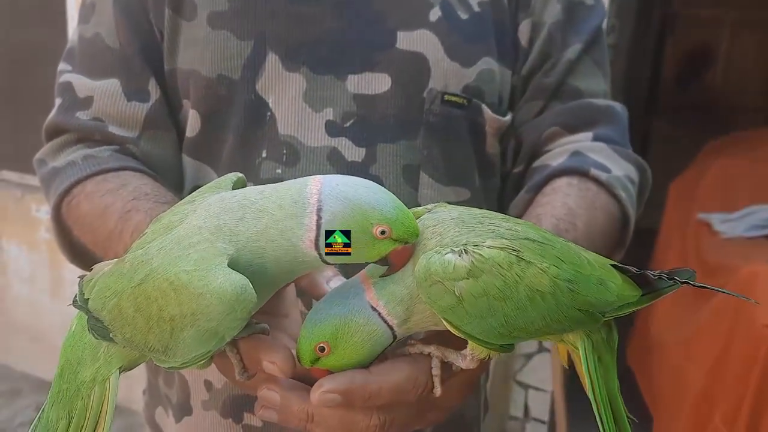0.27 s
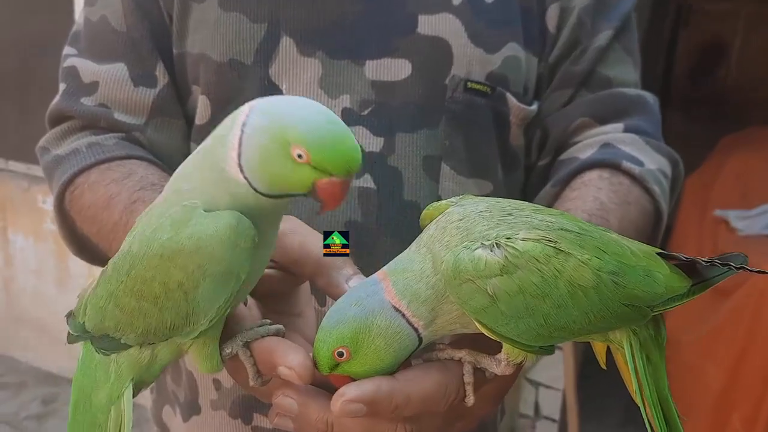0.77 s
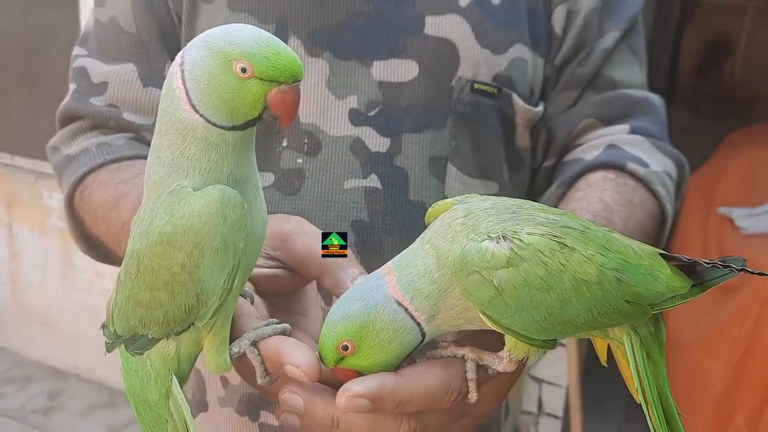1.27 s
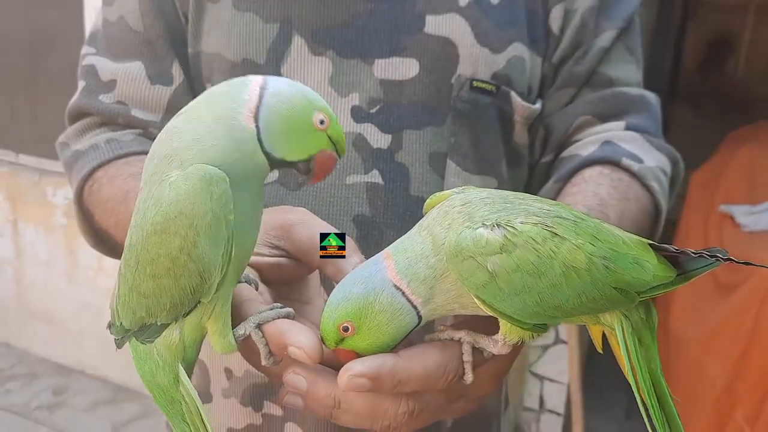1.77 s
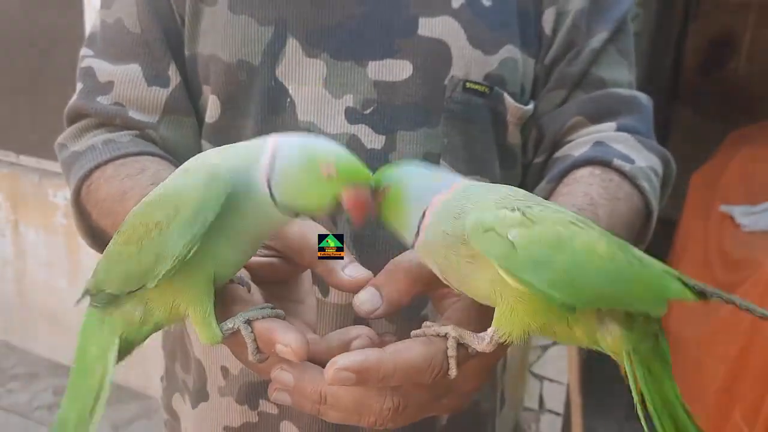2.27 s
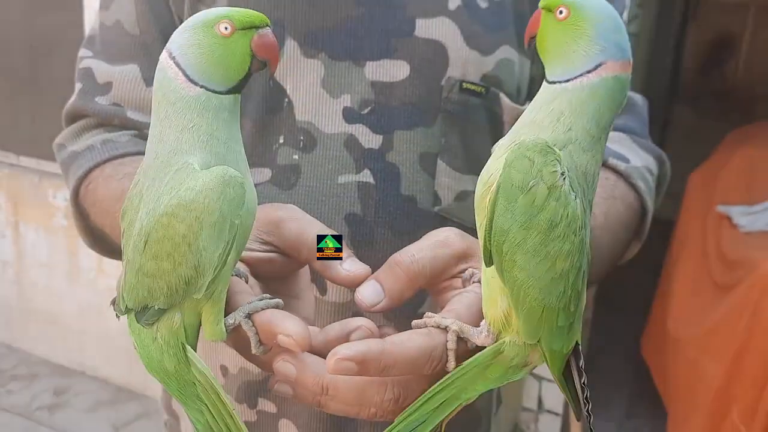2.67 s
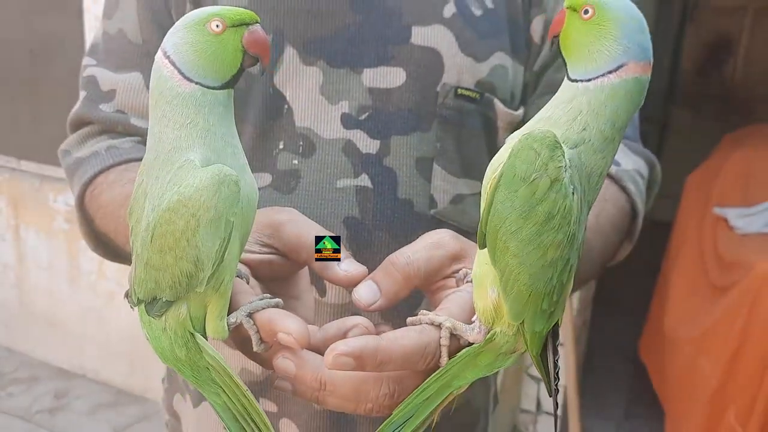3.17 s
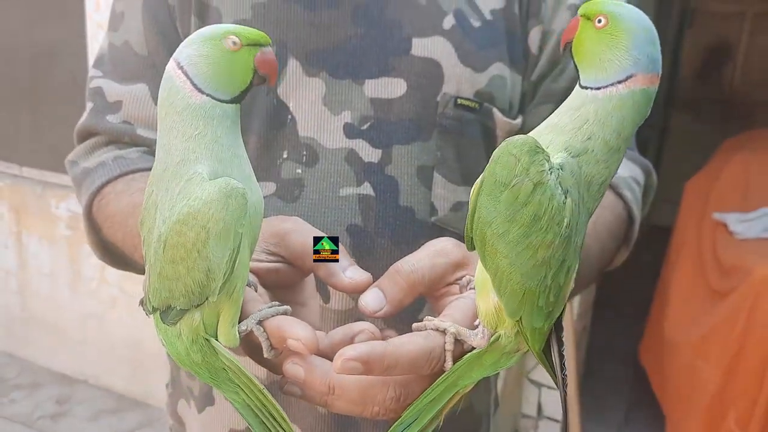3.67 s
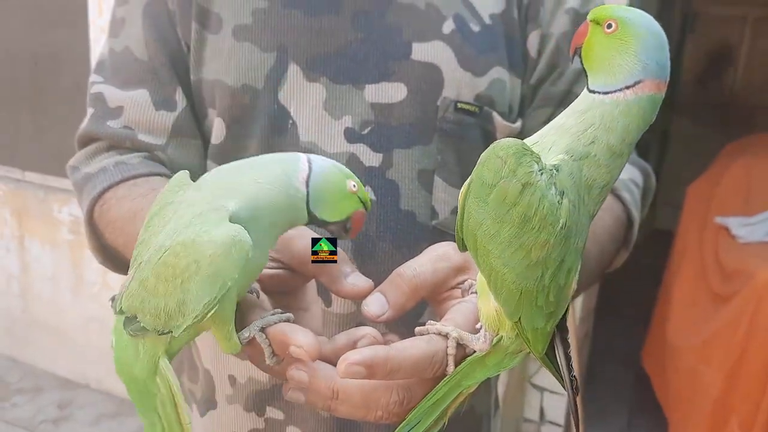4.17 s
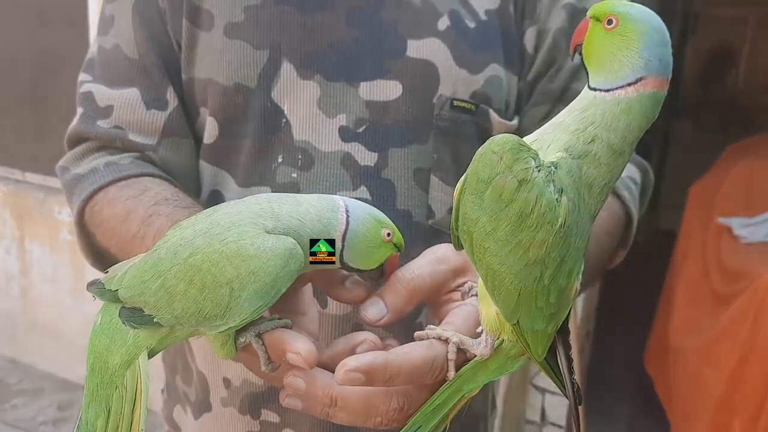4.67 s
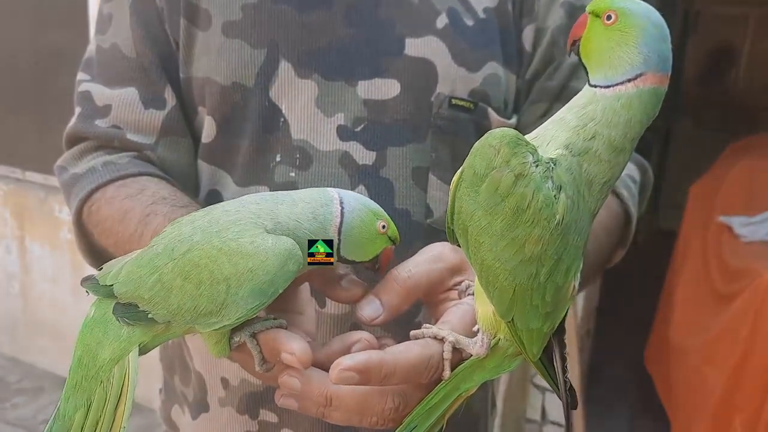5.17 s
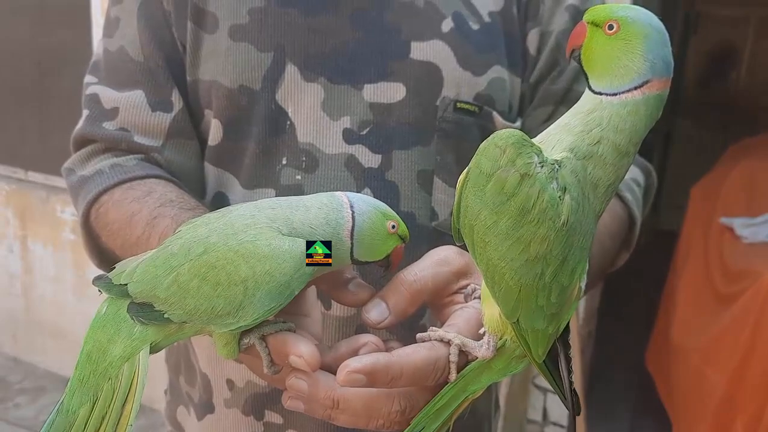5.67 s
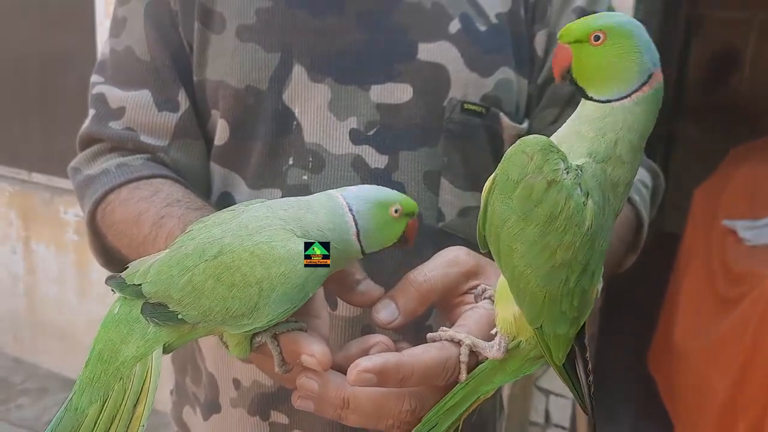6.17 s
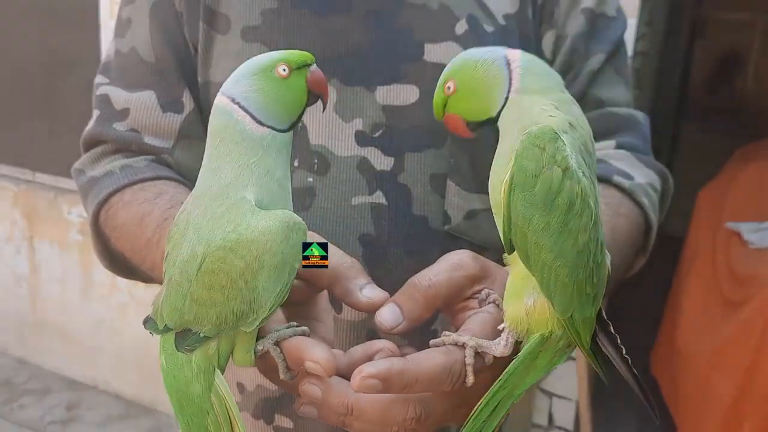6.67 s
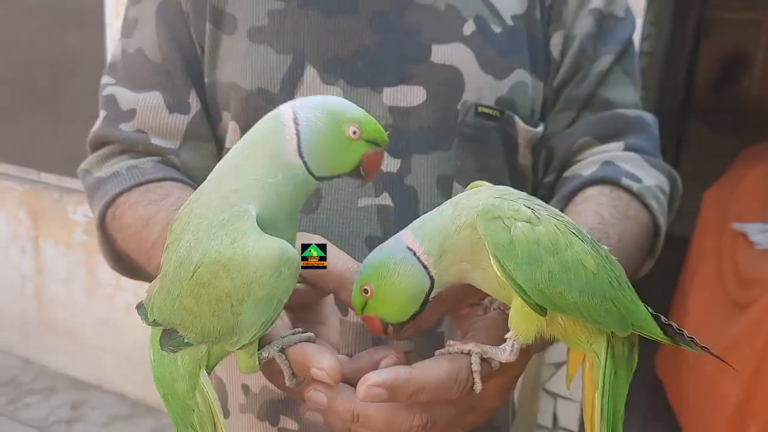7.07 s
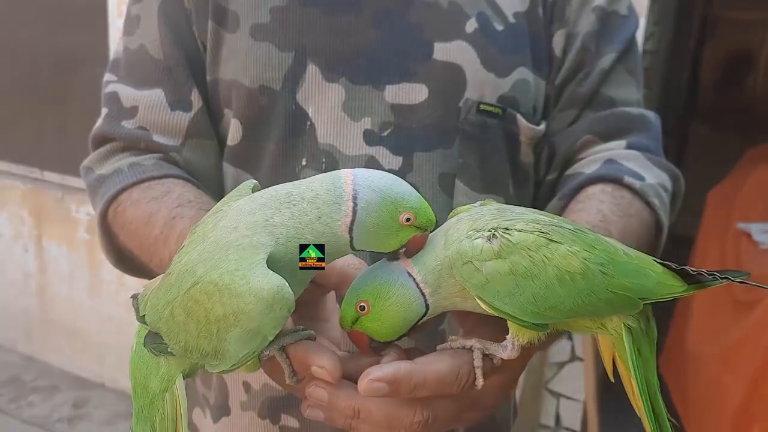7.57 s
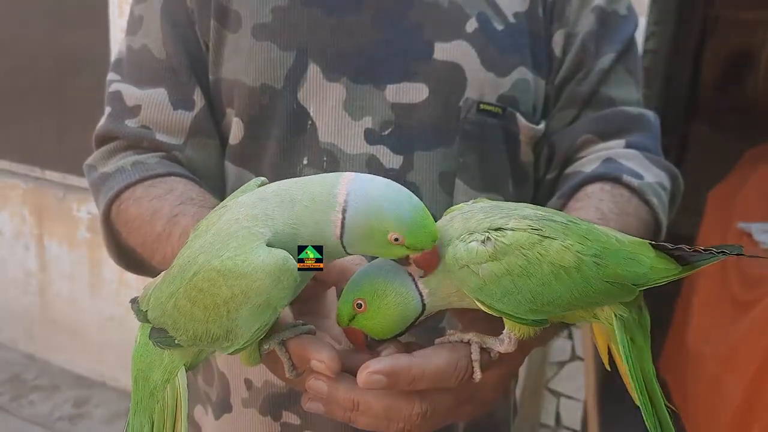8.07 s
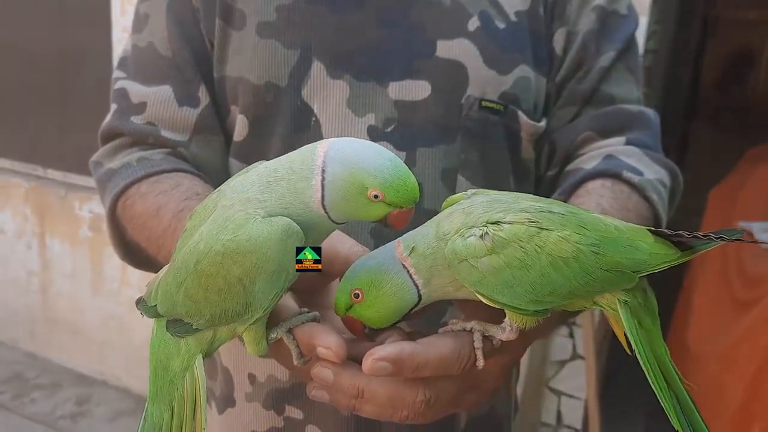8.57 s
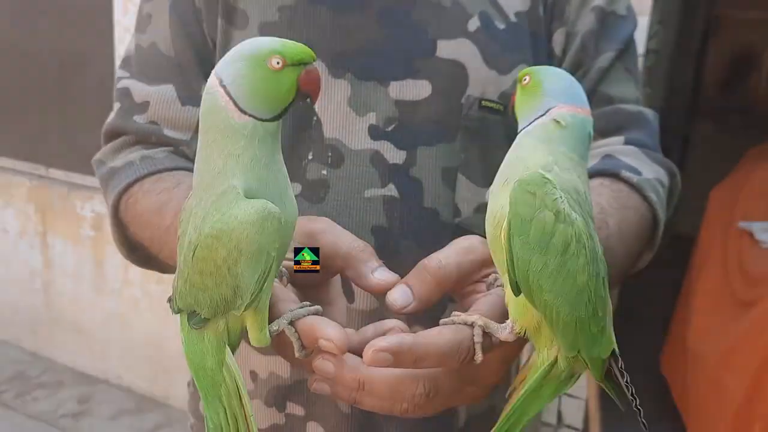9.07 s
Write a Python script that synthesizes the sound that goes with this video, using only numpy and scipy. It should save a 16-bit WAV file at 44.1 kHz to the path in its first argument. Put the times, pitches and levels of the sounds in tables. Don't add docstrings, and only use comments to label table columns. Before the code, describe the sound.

In a small walled yard, a near parakeet on the left opens with a clear held note of about 0.2 s, over a brief sliding undertone. Its beak clicks at 0.3 s, then five strained squeals scoop sharply upward between 0.4 and 2.05 s. From 2.2 to 3.1 s come soft beak clicks, seed ticks and faint distant peeps and chirps. A far horn wavers from 3.4 to 4.5 s. The near bird mutters around 4 s, rattles at 4.35 s, then mixes breathy hisses and six hoarse clucks from 4.6 to 5.9 s. From 5.4 s a second parakeet, on the right, screeches hoarsely every 0.3 s until the end, strongest around 7-8 s. Loud beak clicks land at 7.3-7.6 s, a whistle at 7.8-8.1 s, and three abrupt chucks at 8.2-8.6 s. Traffic rumble and air hiss persist; a low engine drone swells near 8.7 s.

```python
import sys
import numpy as np
from scipy import signal
from scipy.fft import rfft, irfft, next_fast_len
from scipy.io import wavfile
from scipy.ndimage import uniform_filter1d

SR = 44100
rng = np.random.default_rng(int(sys.argv[2]) if len(sys.argv) > 2 else 0)


def decibels_to_gain(level_db):
    exponent = np.asarray(level_db, float) / 20
    return 10 ** exponent


def master_out(mix):
    frames = np.transpose(np.atleast_2d(mix))
    ceiling = np.clip(frames, -1, 1)
    pcm = np.round(ceiling * 32767).astype(np.int16)
    wavfile.write(sys.argv[1], SR, pcm)


N = 410571


def evened(x):
    return x / np.sqrt(np.mean(abs(x) ** 2) + 1e-20)


def read(points, hz):
    f, value = np.transpose(points)
    return np.interp(np.log(hz + 1), np.log(f + 1), value)


def add(mix, s, sound):
    part = mix[round(s * SR):][:len(sound)]
    part += sound[:len(part)]


def curves(rows):
    s, *columns = np.transpose(rows)
    return [np.interp(np.arange(s[0], s[-1], 1 / SR), s, c) for c in columns]


def tinted(size, points):
    spectrum = rfft(rng.standard_normal(size))
    return evened(irfft(spectrum * decibels_to_gain(read(points, np.fft.rfftfreq(size, 1 / SR))), size))


def syrinx(hz, order_db, hoarse, flutter_hz):
    out, turns = 0, 2 * np.pi * np.cumsum(hz) / SR
    for k, db in enumerate(order_db, 1):
        r = np.exp(-np.pi * flutter_hz * np.sqrt(k) / SR)
        noise = rng.standard_normal((len(hz) + 500, 2)) @ [1, 1j]
        shake = signal.lfilter([1], [1, -2 * r, r * r], noise)[500:]
        share = np.clip(hoarse * (k * hz / 3000) ** 0.75, 0, 1)
        waver = np.sqrt(1 - share) + np.sqrt(share) * evened(shake)
        wave = (waver * np.exp(1j * k * (turns + k / 2))).real
        out = out + decibels_to_gain(db) * (k * hz < 16500) * wave
    return evened(out)


def call(rows, throat, breath_db, flutter_hz, break_db=0, flare_db=0, dull=0):
    db, hz, hoarse = curves(rows)
    hz = uniform_filter1d(hz, size=min(len(hz) // 8, 700), mode="nearest")
    order_db = [read(throat, k * hz) for k in range(1, 26)]
    breaks = uniform_filter1d(uniform_filter1d(rng.standard_normal((25, len(hz))), size=500), size=300)
    order_db = order_db + break_db * evened(breaks) * np.minimum(np.arange(25) / 2, 1)[:, None]
    order_db[1] += flare_db * np.interp(hz, [1190, 1740], [0, 1])
    effort_db = dull * (db - db.max())
    order_db += effort_db * np.arange(25)[:, None]
    power = sum(decibels_to_gain(d) ** 2 for d in order_db)
    voice = syrinx(hz, order_db - 10 * np.log10(power), hoarse, flutter_hz)
    breath = decibels_to_gain(breath_db + 2 * effort_db) * hoarse * tinted(len(hz), throat)
    return decibels_to_gain(db) * (voice + breath) * signal.windows.tukey(len(hz), 200 / len(hz))


def sing(notes):
    out = np.zeros(N)
    for rows, order_db, hoarse, flutter_hz in notes:
        hz, db = curves(rows)
        hz = uniform_filter1d(hz, size=500, mode="nearest")
        voice = decibels_to_gain(db) * syrinx(hz, order_db, hoarse, flutter_hz)
        add(out, rows[0][0], voice * signal.windows.tukey(len(hz), .15))
    return out


# frequency in Hz, level in dB.
SQUEAL_THROAT = [(500, 2.5), (900, -14), (1500, -9), (2200, -6.5), (2900, -5.5), (3600, -1), (4200, -3),
                 (4700, -3.5), (5300, -2), (5900, -6.5), (6400, -15), (7400, -10), (8300, -13.5),
                 (9300, -25), (11500, -18), (16000, -22)]


def squeal(length, db, first_hz, knee_hz):
    hold_s, shut_s = .009, .013
    top_hz, strain_hz_per_s = 2200, 12200
    top = length - hold_s - shut_s
    knee = top - (top_hz - knee_hz) / strain_hz_per_s
    shape = [(0, -23, first_hz), (.04, -11.5, 928), (knee, -6.5, knee_hz),
             ((knee + top) / 2, 1, (knee_hz + top_hz) / 2), (top, 0, top_hz),
             (top + hold_s, -7.5, top_hz), (length, -17.5, top_hz - 20)]
    rows = [(s, db + d, hz, np.interp(hz, [1000, 1500, 2100], [.11, .27, .42])) for s, d, hz in shape]
    voice = call(rows, SQUEAL_THROAT, breath_db=-13.0, flutter_hz=410, break_db=3, flare_db=7.5, dull=0.053)
    crack = np.exp(-((np.arange(len(voice)) / SR - knee - 0.025) / 0.0067) ** 2)
    voice = voice * decibels_to_gain(-2.5 * crack)
    add(voice, .006, decibels_to_gain(-18.5) * voice.copy())
    at = np.arange(len(voice))
    return voice - decibels_to_gain(-14) * np.interp(at - 0.000632 * SR, at, voice)


# start in seconds, length in seconds, level in dB, first pitch in Hz,
# pitch where the strain begins in Hz.
SQUEALS = [
    (0.389, 0.235, -18, 788, 1354),
    (0.744, .22, -19, 631, 1206),
    (1.093, .22, -19.5, 653, 1216),
    (1.453, .22, -20.5, 628, 1221),
    (1.816, .23, -20.5, 629, 1225),
]


def squeals():
    out = np.zeros(N)
    for s, *row in SQUEALS:
        add(out, s, squeal(*row))
    return out


# time in seconds, level in dB, pitch in Hz, hoarseness from 0 to 1.
HELD = [(0, -24, 966, 0.13), (.036, -23.5, 1011, 0.04), (.114, -25.5, 1034, 0.12),
        (.152, -27.5, 1032, 0.16), (.178, -49.5, 980, 0.2)]
# frequency in Hz, level in dB.
HELD_THROAT = [(530, -17), (900, -9.5), (1830, -11.5), (2070, -1), (2450, -14), (3070, -11.5), (4150, -9.5),
               (4800, -4.5), (5300, -2), (5900, -16), (6640, -15.5), (7060, -16.5), (10400, -24.5),
               (12400, -18.5), (16000, -31)]


def held_note():
    out = np.zeros(N)
    add(out, 0, call(HELD, HELD_THROAT, breath_db=8, flutter_hz=45))
    return out


# start in seconds, length in seconds, level in dB, highest pitch in Hz.
CLUCKS = [
    (4.784, 0.055, -27, 992),
    (4.98, 0.063, -25, 1050),
    (5.203, 0.061, -25.5, 1020),
    (5.419, 0.065, -24, 1050),
    (5.626, .062, -23, 1164),
    (5.821, 0.069, -24, 1170),
]
# frequency in Hz, level in dB.
CLUCK_THROAT = [(400, -32), (620, 0), (1000, -11), (1400, -0.5), (1800, -4), (2300, 3), (2900, -5.5),
                (3600, -4), (4400, -4), (6200, -14.5), (12000, -17), (16000, -25.5)]


def clucks():
    low_hz, hoarse = 560, .55
    humps = [(0, .1, -13), (.33, 1, -0.5), (.52, .6, 1), (.68, 1.15, 4.5), (.82, .6, 0), (1, -0.07, -2)]
    out = np.zeros(N)
    for s, length, db, top_hz in CLUCKS:
        arch = [(s + u * length, db + d, low_hz + lift * (top_hz - low_hz), hoarse) for u, lift, d in humps]
        add(out, s, call(arch, CLUCK_THROAT, breath_db=-3, flutter_hz=260, dull=.12))
    return out


# start in seconds, length in seconds, level in dB, first pitch in Hz, highest in Hz.
CHUCKS = [
    (8.222, 0.027, -18.5, 1253, 1533),
    (8.38, 0.031, -19, 1193, 1702),
    (8.546, 0.036, -19, 1300, 1970),
]
# frequency in Hz, level in dB.
CHUCK_THROAT = [(350, -49), (600, -11), (727, -8.5), (1210, -13.5), (1490, -9.5), (1680, -18.5),
                (2180, 9.5), (2500, -7), (3300, 0), (3890, -0.5), (4700, -4), (5600, -10.5), (16000, -24)]
MUTTERS = [
    (3.916, 0.011, -36.5, 540, 525),
    (4.121, 0.026, -31.5, 590, 517),
]
# frequency in Hz, level in dB.
MUTTER_THROAT = [(260, -34), (450, -7), (1240, -9.5), (1530, 0), (1780, -23), (2070, 3), (2400, -27),
                 (3810, -5.5), (4770, -18.5), (11300, -29), (16000, -35)]


def chucks_and_mutters():
    out = np.zeros(N)
    for table, throat, end in [(CHUCKS, CHUCK_THROAT, 0.31), (MUTTERS, MUTTER_THROAT, 0.734)]:
        for s, length, db, first_hz, top_hz in table:
            drop = [(0, db - 2, first_hz, .4), (0.43 * length, db, top_hz, .3),
                    (length, db - 11.5, end * first_hz, .5)]
            add(out, s, call(drop, throat, breath_db=-1, flutter_hz=300, dull=.12))
    return out


# time in seconds, level in dB, puffs per second.
RATTLE = [(4.343, -40, 68.4), (4.37, -32.5, 87.4), (4.409, -36.5, 69), (4.451, -47, 66)]
# frequency in Hz, width in Hz, level in dB.
RATTLE_RINGS = [(600, 43, 12), (1050, 170, 11), (1536, 130, 9), (1910, 330, 4), (2600, 300, -22),
                (5360, 440, -8)]


def rattle():
    db, rate = curves(RATTLE)
    at = np.arange(len(db))
    pulses = np.diff(np.floor(np.cumsum(rate) / SR), prepend=-1)
    pulses = pulses * decibels_to_gain(1.5 * rng.standard_normal(len(db)))
    grain = rng.standard_normal(len(db)) * 1.6 + np.cos(at * .2)
    puffs = signal.fftconvolve(pulses, np.hanning(220))[:len(db)] * grain
    t = np.arange(600) / SR
    ring = sum(decibels_to_gain(d) * width * np.exp(-np.pi * width * t) * np.sin(2 * np.pi * hz * t)
               for hz, width, d in RATTLE_RINGS)
    sound = evened(signal.fftconvolve(puffs, ring)[:len(db)])
    slowing = np.cumsum(np.linspace(1.08, 0.92, len(db)))
    sound = decibels_to_gain(db) * np.interp(slowing, at, sound) * np.minimum(at / 300, 1)
    out = np.zeros(N)
    add(out, RATTLE[0][0], sound)
    return out


# start in seconds, level in dB, length in seconds, beak whistle in dB.
HISSES = [
    (4.597, -23, 0.079, -1.5),
    (4.896, -24.5, 0.065, -8),
    (5.193, -25, .05, -3),
    (5.673, -27.5, .045, -9),
    (5.909, -25.5, .025, -9.5),
]
# frequency in Hz, level in dB.
HISS = [(500, -20), (900, -17), (1500, -21.5), (2500, -11), (3800, -12.5), (5800, -9.5), (6900, -8),
        (7700, -5.5), (8600, -6), (9800, -11.5), (12300, -6), (16000, -14)]
# frequency in Hz, level in dB.
HISS_WHISTLE = [(5500, -45), (7200, 0), (8200, 2), (9000, -12), (10500, -42)]


def hisses():
    out = np.zeros(N)
    for s, db, length, whistle_db in HISSES:
        puff = [(0, -14), (.003, -3), (.22 * length, 0), (0.6 * length, -3), (0.67 * length, -12), (length, -30)]
        level_db, = curves(puff)
        breath = tinted(len(level_db), HISS)
        whistle = decibels_to_gain(whistle_db) * tinted(len(level_db), HISS_WHISTLE)
        add(out, s, decibels_to_gain(db + level_db) * (breath + whistle))
    return out


# time in seconds, pitch in Hz, level in dB.
WHISTLES = [
    [(4.87, 1590, -28), (4.884, 1493, -36.5), (4.966, 1485, -24), (5.006, 1656, -27.5), (5.02, 1890, -40)],
    [(7.785, 1178, -40), (7.801, 1188, -43), (7.913, 1305, -33.5), (7.975, 1806, -36), (8.012, 1924, -29.5),
     (8.026, 1890, -51), (8.04, 1870, -34.5), (8.099, 1420, -28.5), (8.125, 1355, -35)],
]
# time in seconds, pitch in Hz, level in dB.
SLIDE = [(.03, 894, -50), (.05, 716, -36), (.09, 600, -35), (.135, 385, -43.5)]
SLIDE_ORDERS_DB = [2, 2.5, 2.5, -13]


def whistles_and_slide():
    notes = [(rows, [0, -45], .02, 60) for rows in WHISTLES]
    return sing(notes + [(SLIDE, SLIDE_ORDERS_DB, .2, 60)])


# start in seconds, peak in dB, low ring in Hz, high ring in Hz, crack in dB.
CLICKS = [
    (0.298, -23.5, 2465, 2600, -7),
    (2.253, -35, 2120, 2200, -22),
    (2.394, -36, 1910, 2920, -14),
    (2.761, -31, 2180, 2260, 8.5),
    (2.914, -31, 2170, 2200, 10),
    (7.304, -19.5, 1050, 4260, 3.5),
    (7.452, -17.5, 1110, 2190, -2),
    (7.607, -22, 1010, 4230, 4.5),
]
# frequency in Hz, level in dB.
CRACK = [(410, -55.5), (700, -69), (1020, -4.5), (1460, -27.5), (2220, -3), (2800, -13), (5610, -20),
         (6650, -22.5), (16000, -35.5)]


def beak_clicks():
    middle, left = np.zeros((2, N))
    t = np.arange(900) / SR
    for s, db, low_hz, high_hz, crack_db in CLICKS:
        ring = np.sin(2 * np.pi * low_hz * t) + 0.72 * np.sin(2 * np.pi * high_hz * t)
        crack = decibels_to_gain(crack_db - 60 * t / 0.012) * tinted(len(t), CRACK)
        click = decibels_to_gain(db) * (ring * decibels_to_gain(-60 * t / 0.021) + crack) * np.minimum(t / 0.0015, 1)
        add(middle if s < 3 else left, s, click)
    return middle, left


# frequency in Hz, level in dB.
CLAW = [(3000, -26), (6500, -17), (11000, 8), (16000, -4)]


def claw_tick():
    out = np.zeros(N)
    t = np.arange(900) / SR
    add(out, 5.298, decibels_to_gain(-38 - 60 * t / 0.022) * tinted(len(t), CLAW))
    return out


# start in seconds, level in dB, pitch in Hz.
SEEDS = [
    (2.726, -55, 4700),
    (2.745, -52, 3900),
    (3.85, -51, 9000),
    (3.88, -52, 6200),
    (7.53, -43, 8980),
]


def seed_ticks():
    out = np.zeros(N)
    t = np.arange(900) / SR
    for s, db, hz in SEEDS:
        band = [(.6 * hz, -25), (hz, 0), (1.13 * hz, -20)]
        add(out, s, decibels_to_gain(db - 60 * t / 0.035) * tinted(len(t), band))
    return out


def left_bird():
    middle_clicks, left_clicks = beak_clicks()
    left = held_note() + squeals() + chucks_and_mutters() + rattle() + whistles_and_slide()
    left += left_clicks + claw_tick()
    return left, clucks() + middle_clicks + seed_ticks(), hisses()


LEAD_S = .018
# share of the fall time, pitch in Hz, level in dB.
SCREECH_FALL = [(.13, 2129, -3.5), (.24, 1963, -3), (.42, 1790, -4.5), (.64, 1625, -9.5), (.92, 1660, -20),
                (1.3, 1720, -27)]
# frequency in Hz, level in dB.
SCREECH_THROAT = [(1600, -10.5), (2000, -13), (2700, -11), (3300, 5.5), (3700, 4.5), (4100, 0),
                  (4600, -0.5), (5300, -1), (6000, -10), (7000, -7), (8000, -22.5), (9500, -19.5),
                  (12000, -21), (16000, -35)]
# frequency in Hz, level in dB.
RASP = [(600, -17.5), (1000, -14), (1500, -14), (1900, -15), (2600, -11.5), (3050, -12), (3500, -7.5),
        (4300, -3.5), (6500, -17), (8000, -9), (16000, -19)]


def screech(start_hz, top_hz, crest, hold):
    rows = [(-LEAD_S, start_hz, -27), (0, start_hz, -21), (0.305 * crest, start_hz, -11),
            (.45 * crest, start_hz + 150, -7), (.75 * crest, top_hz - 110, -5),
            (crest, top_hz, -3.5), (crest + hold, top_hz - 90, -4)]
    rows += [(crest + hold + u * .138, hz, d) for u, hz, d in SCREECH_FALL]
    hz, level_db = curves(rows)
    hz = uniform_filter1d(hz, size=200, mode="nearest")
    drift = evened(uniform_filter1d(rng.standard_normal(len(hz)), size=900))
    beat = np.cumsum(77 * (1 + .25 * drift)) / SR
    level_db = level_db + 1.8 * (np.cos(2 * np.pi * beat) - .4)
    order_db = np.array([read(SCREECH_THROAT, k * hz) + 0.023 * max(k - 2, 0) * level_db for k in range(1, 9)])
    order_db -= 10 * np.log10(np.sum(decibels_to_gain(order_db) ** 2, axis=0))
    hoarse = np.interp(level_db, [-12, -3], [.95, .48])
    voice = syrinx(hz, order_db, hoarse, 340)
    return decibels_to_gain(level_db) * (voice + decibels_to_gain(-6.5) * tinted(len(hz), RASP))


# start in seconds, level in dB, opening pitch in Hz,
# seconds until the crest, seconds the crest is held.
SCREECHES = [(5.379, -22.5, 2200, 0.037, 0.021), (5.642, -23, 2296, .016, .02),
             (5.902, -22, 2450, 0.025, 0.019), (6.161, -21.5, 2372, 0.037, 0.018),
             (6.436, -21, 2200, 0.034, .02), (6.705, -20, 2200, 0.045, 0.017),
             (6.979, -18.5, 2255, 0.048, 0.015), (7.278, -18.5, 1980, .043, .013),
             (7.579, -19, 1982, 0.047, 0.016), (7.88, -18.5, 1964, .047, .013),
             (8.18, -20, 2050, 0.047, .016), (8.48, -21, 1995, 0.039, .02),
             (8.768, -20, 1919, 0.041, 0.024), (9.063, -19.5, 1890, 0.046, 0.025)]


def right_bird():
    out = np.zeros(N)
    for s, db, start_hz, crest, hold in SCREECHES:
        top_hz = 2873 - 10000 * hold
        add(out, s - LEAD_S, decibels_to_gain(db) * screech(start_hz, top_hz, crest, hold))
        held = 1.03 * start_hz * np.ones(round((crest + 0.0085) * SR))
        add(out, s, decibels_to_gain(db - 10) * np.hanning(len(held)) ** 0.7 * syrinx(held, [-14, 0], 0.72, 250))
        stay = top_hz * np.ones(round(0.034 * SR))
        add(out, s + 0.78 * crest, decibels_to_gain(db - 19) * np.hanning(len(stay)) ** 0.3 * syrinx(stay, [0, -6], 0.1, 160))
    dry_bird = out.copy()
    for lag_s, db in [(.007, -14), (.013, -14), (.022, -19)]:
        add(out, lag_s, decibels_to_gain(db) * dry_bird)
    return out


# time in seconds, pitch in Hz, level in dB.
CHIRP = [(2.32, 2210, -49), (2.33, 2210, -39), (2.354, 2158, -39), (2.39, 2065, -41.5), (2.4, 1980, -59)]
CHIRP_ORDERS_DB = [-9.5, -1.5, -10.5, -12, -19, -16, -17]


def right_chirp():
    return sing([(CHIRP, CHIRP_ORDERS_DB, .2, 90)])


# start in seconds, length in seconds, level in dB,
# pitch at both ends in Hz, pitch at the bend in Hz.
PEEPS = [
    (0.641, 0.057, -38, 1955, 2305),
    (2.795, 0.14, -57.5, 1820, 1516),
]
PEEP_ORDERS_DB = [-3, -41, -27, -36, -36, -50.5, -36]
# time in seconds, pitch in Hz, level in dB.
FLICK = [(2.875, 1620, -54), (2.885, 1950, -37.5), (2.91, 2340, -47)]
# time in seconds, pitch in Hz, level in dB.
PIPE = [(3.001, 2060, -52), (3.022, 1934, -44), (3.062, 1932, -35), (3.1, 2150, -41.5), (3.114, 2170, -55)]
# time in seconds, pitch in Hz, level in dB.
SCOLD = [(2.712, 2870, -58), (2.735, 2484, -51), (2.79, 2164, -46.5), (2.83, 1900, -63)]
# time in seconds, pitch in Hz, level in dB.
COO = [(2.525, 635, -67), (2.6, 812, -59), (2.615, 790, -55), (2.632, 686, -56)]
COO_ORDERS_DB = [-31, -8, 0, -9]


def yard_birds():
    bends = []
    for s, length, db, ends_hz, bend_hz in PEEPS:
        bend_s = 0.37 * length
        bends.append([(s, ends_hz, db - 14), (s + bend_s / 2, 0.33 * ends_hz + 0.82 * bend_hz, db - 14 / 3),
                      (s + bend_s, bend_hz, db), (s + length, ends_hz, db - 13.5)])
    peeps = [(rows, PEEP_ORDERS_DB, .15, 60) for rows in bends + [FLICK, PIPE]]
    return sing(peeps + [(SCOLD, [0, -18], .8, 350), (COO, COO_ORDERS_DB, .15, 60)])


# multiple of its pitch, level in dB.
HORN = [(5, -68), (6, -46), (7, -49), (8, -68), (15, -79), (18, -80), (23, -86), (27, -88)]
# time in seconds, level in dB.
HORN_SWELL = [(3.441, -44), (3.56, -4), (4.1, -0.5), (4.35, -6), (4.47, -25)]


def horn():
    level_db, = curves(HORN_SWELL)
    order_db = [dict(HORN).get(k, -140) for k in range(1, 28)]
    loud_db = 10 * np.log10(np.sum(decibels_to_gain(np.array(order_db)) ** 2))
    out = np.zeros(N)
    pitch_hz = 456 + 0 * level_db
    add(out, HORN_SWELL[0][0], decibels_to_gain(level_db + loud_db) * syrinx(pitch_hz, order_db, 0.6, 22))
    return out


# frequency in Hz, likeness from 0 to 1.
SAME = [(60, 0.92), (200, 0.94), (500, 0.22), (1500, 0.056), (8000, 0.083)]


def wash(points, patchy_db):
    frames, hz = N // 256 + 5, np.fft.rfftfreq(1024, 1 / SR)
    a, b, c, d, patches = rng.standard_normal((frames, 513, 5)).T
    patches = evened(uniform_filter1d(uniform_filter1d(patches, size=8, axis=0), size=14, axis=1))
    same = np.clip(read(SAME, hz), -1, 1)[:, None]
    left = a + 1j * b
    z = np.array([left, same * left + np.sqrt(1 - same ** 2) * (c + 1j * d)])
    z *= decibels_to_gain(read(points, hz)[:, None] + patchy_db * patches)
    return evened(signal.istft(z, nperseg=1024, noverlap=768)[1][:, :N])


# time in seconds, nearness in dB.
TRAFFIC = [(0, -1), (.2, -4), (.9, -7.5), (2.1, -10.5), (2.9, -10), (3.3, -6.5), (3.9, -0.5), (7.2, 1.8),
           (9.31, -1)]
# frequency in Hz, level in dB per Hz.
RUMBLE = [(15, -62.5), (25, -20), (42, -11), (107, 1.5), (211, -19.5), (246, -29.5), (287, -6.5),
          (339, -11), (374, -35.5), (530, -38), (700, -28), (910, -36.5), (1540, -120)]
# frequency in Hz, level in dB per Hz.
AIR = [(240, -22), (400, 4.5), (730, -1.5), (1330, -9.5), (1700, -6.5), (3700, -14.5), (6000, -22),
       (11600, -28), (16000, -37.5)]


def yard():
    t = np.arange(N) / SR
    near_db = np.interp(t, *np.transpose(TRAFFIC))
    swell = np.exp(-((t - 8.73) / 0.55) ** 2)
    drone = decibels_to_gain(-35) * swell * np.sin(2 * np.pi * 50 * t)
    rumble = decibels_to_gain(-35.5 + near_db) * wash(RUMBLE, 1.5)
    return rumble + decibels_to_gain(-46.5 + near_db) * wash(AIR, 2.0) + drone


# frequency in Hz, seconds to fade by 60 dB.
WALLS = [(300, 0.12), (2000, 0.36), (4500, 0.29), (9000, 0.33), (16000, 0.021)]


def walls(x, gap_s):
    taps = np.zeros((2, SR // 2))
    at = np.arange(round(gap_s * SR), SR // 2 - 20, 20)
    at = at + rng.integers(0, 20, (2, SR // 40))[:, :len(at)]
    signs = np.sign(rng.standard_normal((2, SR // 40)))
    np.put_along_axis(taps, at, signs[:, :at.shape[1]], 1)
    hz, t, z = signal.stft(taps, SR, nperseg=256)
    tail = signal.istft(z * decibels_to_gain(-60 * t / read(WALLS, hz)[:, None]), SR, nperseg=256)[1]
    return signal.fftconvolve(x[None], tail / np.linalg.norm(tail[0]), axes=1)[:, :N]


# frequency in Hz, level in dB against the direct sound.
SCATTER = [(500, -18), (1500, -12), (4000, -6.5), (9000, -1.5), (16000, 0)]


def ports(x, left_lag_s, pan_db):
    size = next_fast_len(N + 512)
    hz, t = np.fft.rfftfreq(size, 1 / SR), np.arange(400) / SR
    taps = rng.standard_normal((2, 400)) * np.exp(-t / .004) * (t > .0002)
    share = decibels_to_gain(read(SCATTER, hz))
    path = (1 + share * rfft(taps / np.linalg.norm(taps[0]), size)) / np.sqrt(1 + share ** 2)
    path /= np.sqrt(uniform_filter1d(abs(path) ** 2, size=size // 70))
    path[0] *= np.exp(-2j * np.pi * hz * left_lag_s)
    balance = decibels_to_gain(np.array([pan_db / 2, -pan_db / 2]).reshape(2, -1))
    return balance * irfft(rfft(x, size) * path, size)[:, :N]


# time in seconds, left over right in dB.
LEAN = [(2.2, 4.4), (4.3, 1.8), (6.0, 1.2), (8.2, 2.5)]


def scene():
    near, middle, hiss = left_bird()
    far, chirp, small, car = right_bird(), right_chirp(), yard_birds(), horn()
    lean_db = np.interp(np.arange(N) / SR, *np.transpose(LEAN))
    direct = decibels_to_gain(6.5) * ports(near, -0.00011, lean_db)
    direct += decibels_to_gain(3.0) * ports(middle, .000045, 0.3)
    direct += decibels_to_gain(7.5) * ports(hiss, -0.000036, -.3)
    direct += ports(far + decibels_to_gain(1.5) * chirp, 0.0004914, -9)
    direct += decibels_to_gain(-1.0) * ports(car, -0.000095, 0.6)
    direct += decibels_to_gain(2.5) * ports(small, -0.000092, 2.7)
    to_walls = decibels_to_gain(-13.5) * near + decibels_to_gain(-13.0) * (middle + hiss)
    to_walls += decibels_to_gain(-1.0) * car + decibels_to_gain(-8.0) * small + decibels_to_gain(-3) * chirp
    echoes = walls(to_walls, 0.0028)
    dulled = signal.lfilter(*signal.butter(2, 5600, fs=SR), far)
    echoes += decibels_to_gain(np.array([[-4], [-7]])) * walls(dulled, .003)
    return direct + echoes + yard()


def low_pass(x):
    return signal.sosfilt(signal.butter(12, 17010, fs=SR, output="sos"), x)


def record(dry):
    x = dry * decibels_to_gain(np.array([[1.5], [-1.5]]))
    x = np.tanh(1.1 * (x + .08 * x ** 2)) / 1.02
    x = signal.sosfilt(signal.butter(3, 38, "high", fs=SR, output="sos"), x)
    x = signal.sosfilt(signal.ellip(8, .5, 45, 15800, fs=SR, output="sos"), x)
    return low_pass(x)


dry = scene()
out = record(dry)
master_out(out)
```